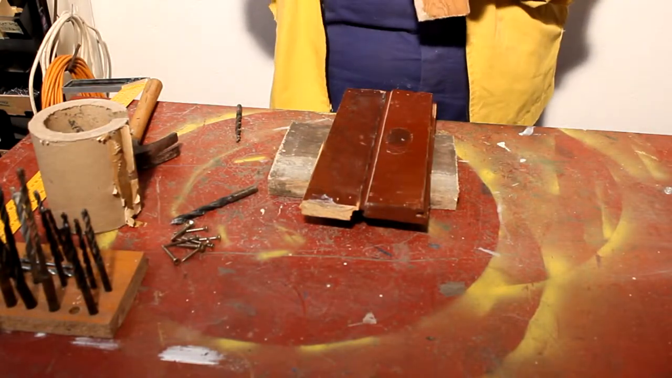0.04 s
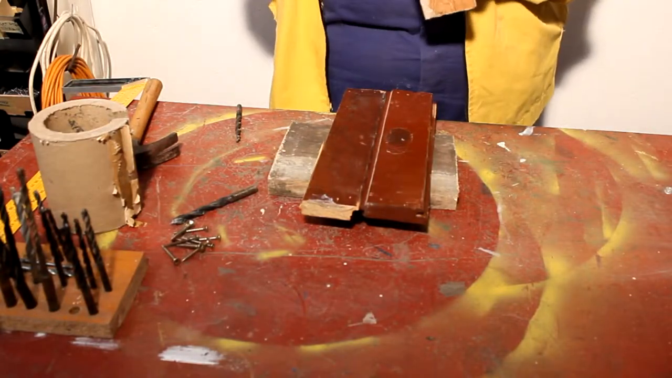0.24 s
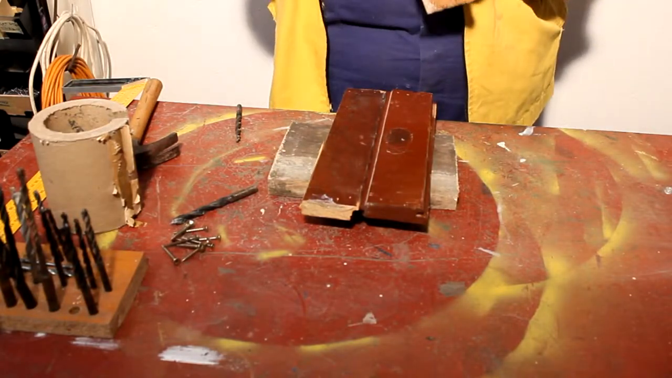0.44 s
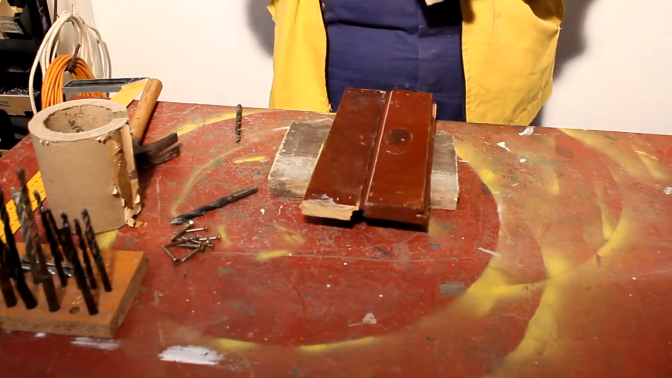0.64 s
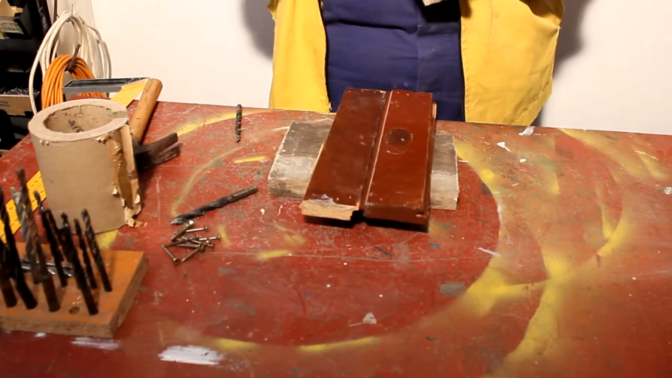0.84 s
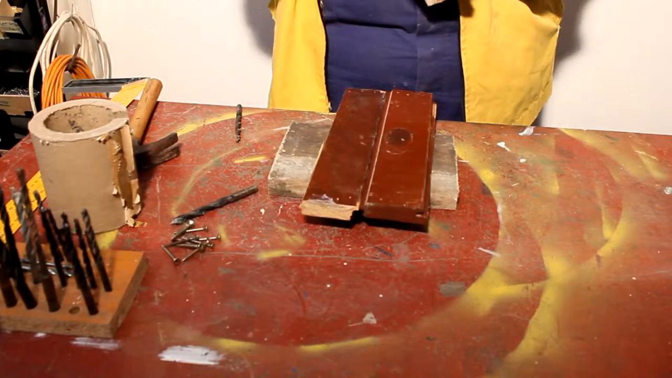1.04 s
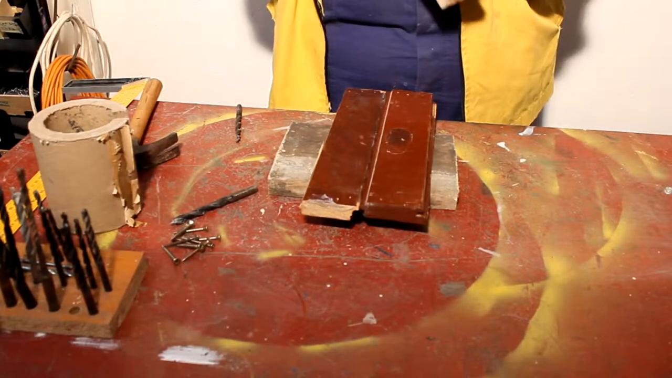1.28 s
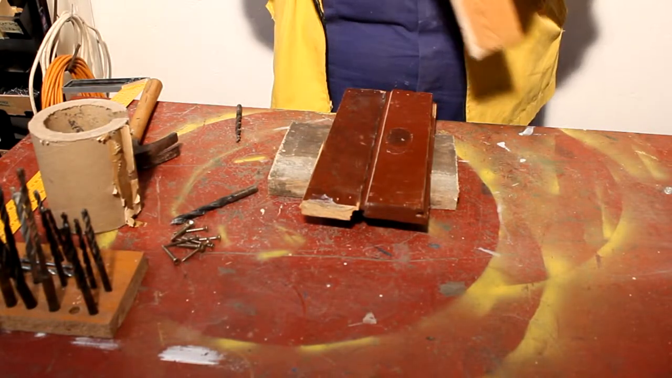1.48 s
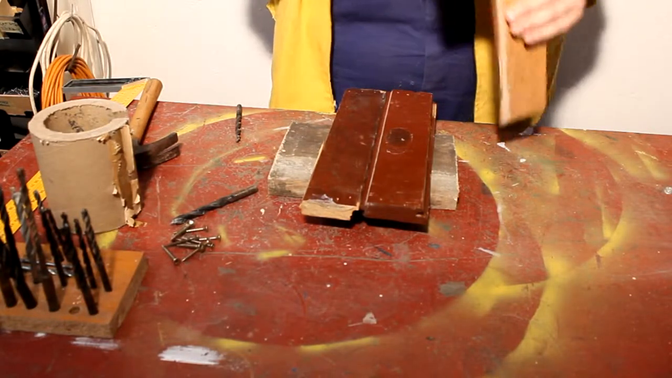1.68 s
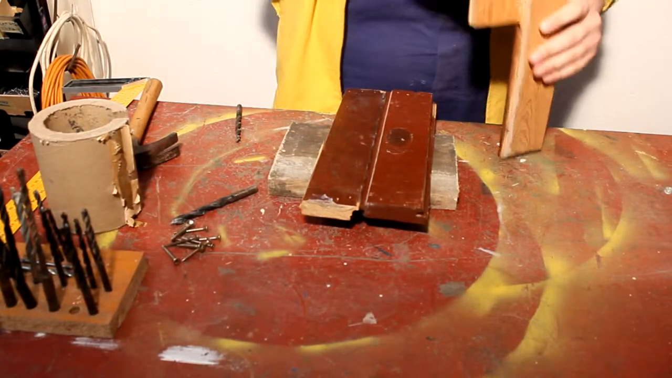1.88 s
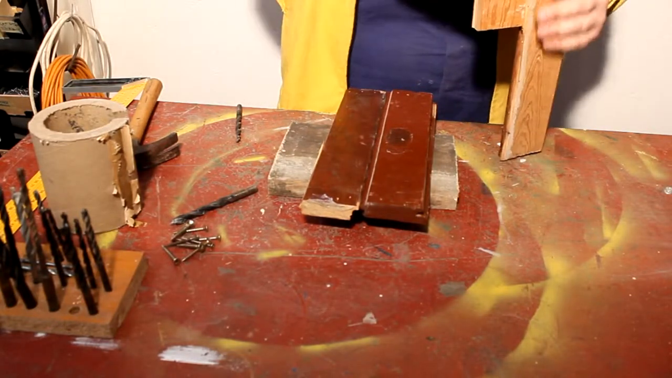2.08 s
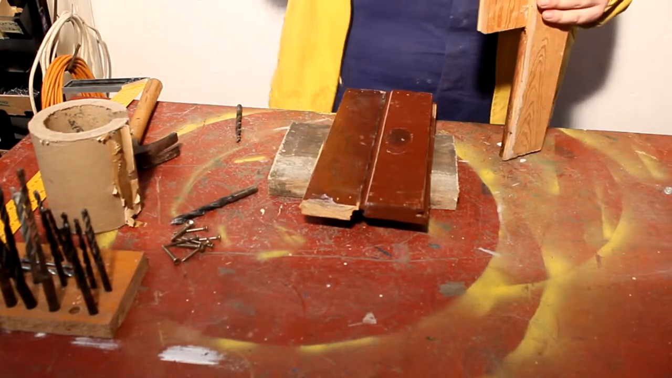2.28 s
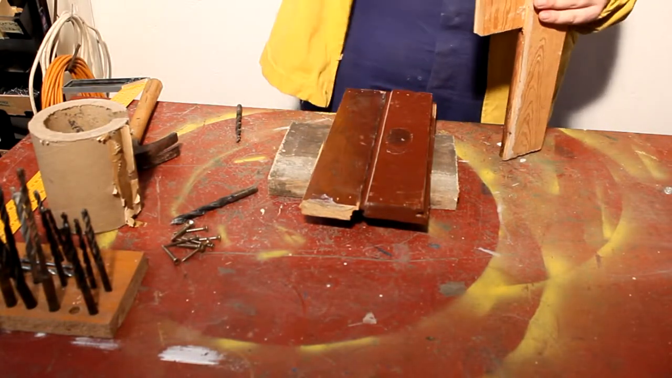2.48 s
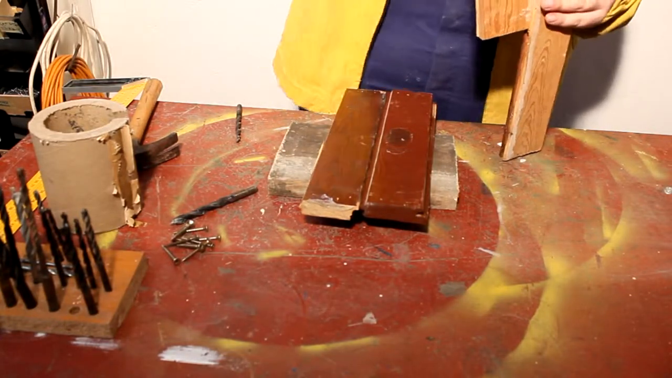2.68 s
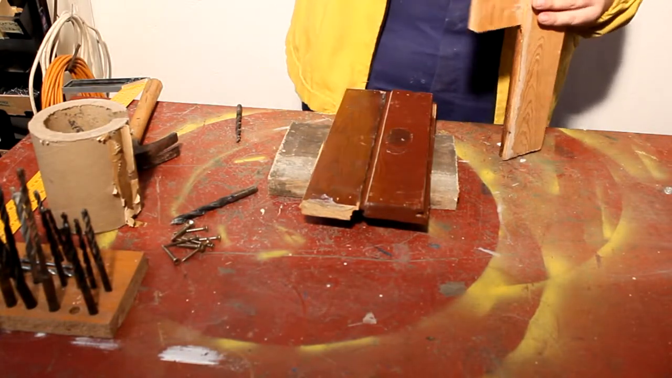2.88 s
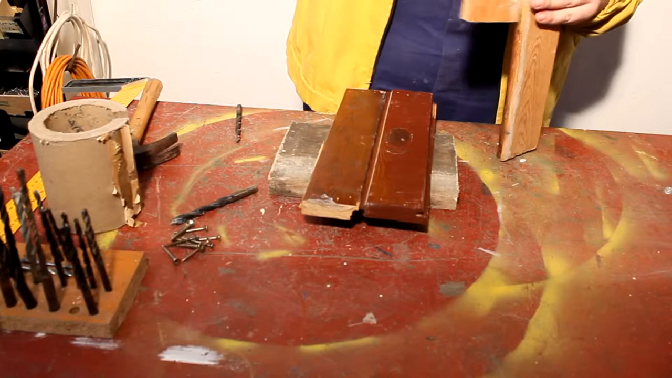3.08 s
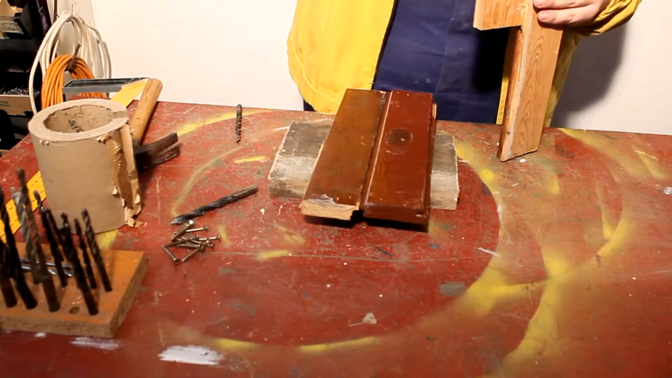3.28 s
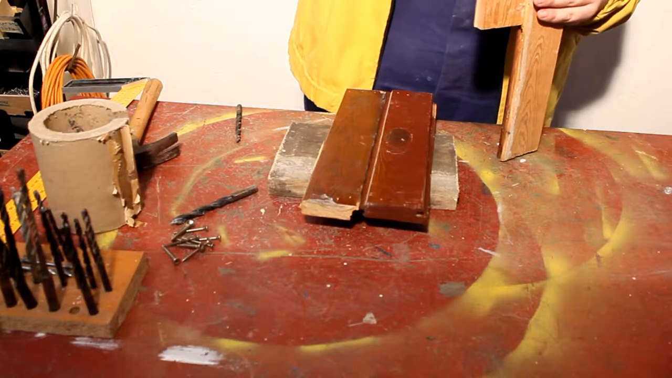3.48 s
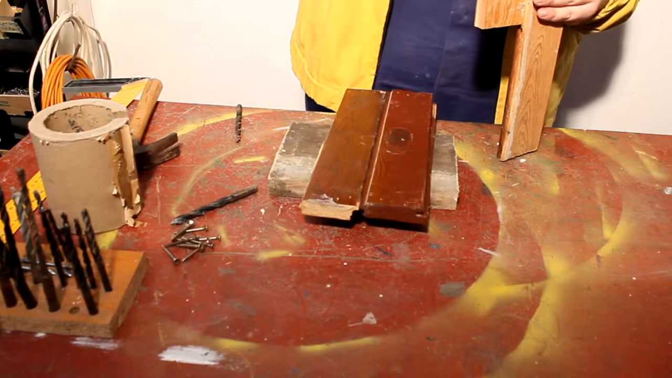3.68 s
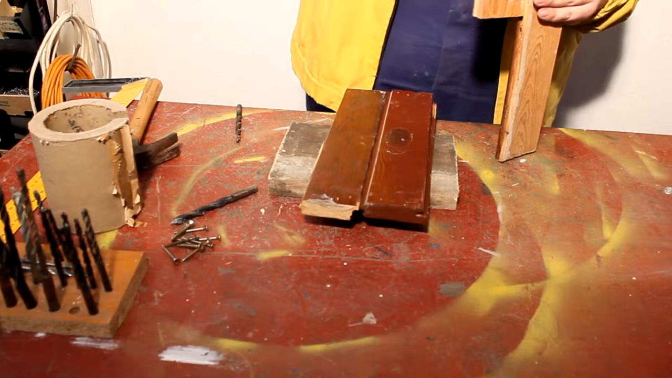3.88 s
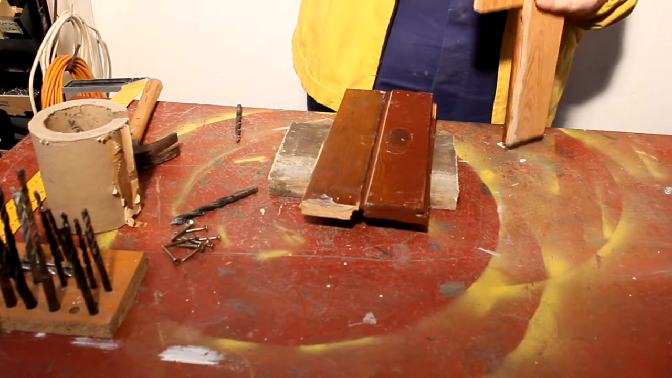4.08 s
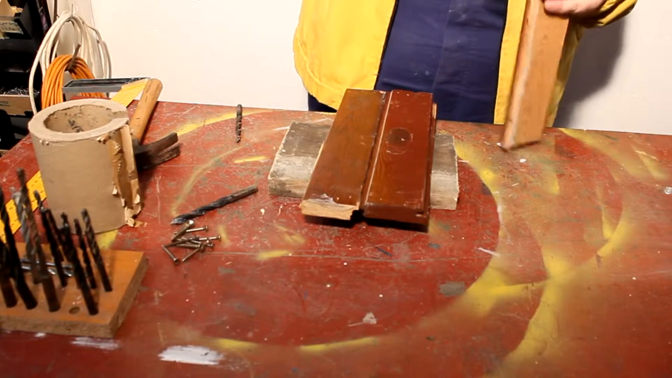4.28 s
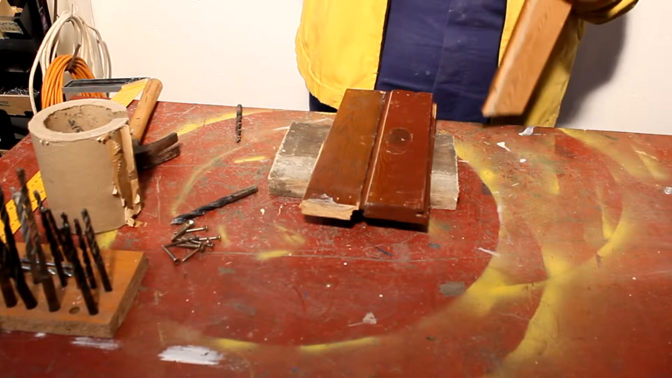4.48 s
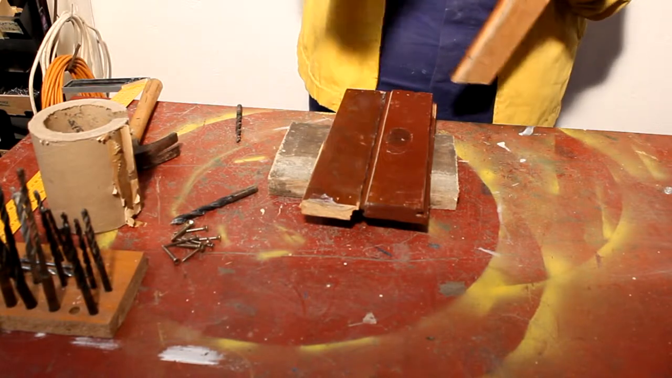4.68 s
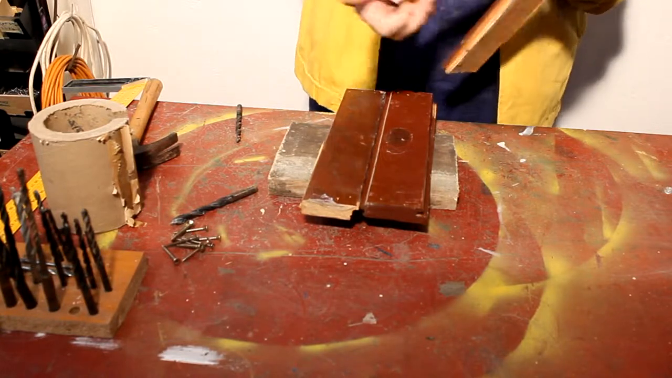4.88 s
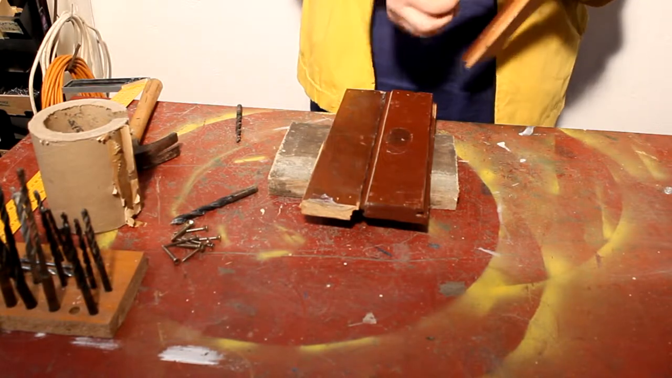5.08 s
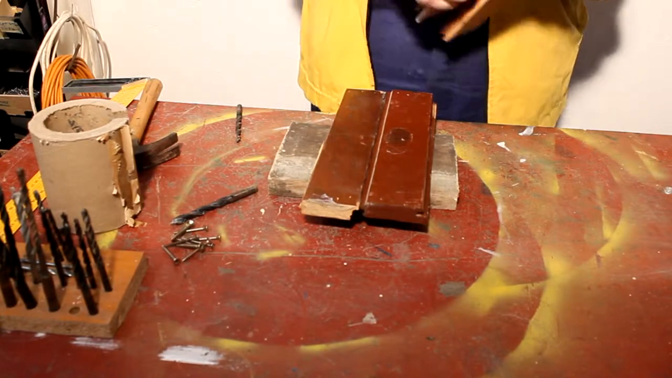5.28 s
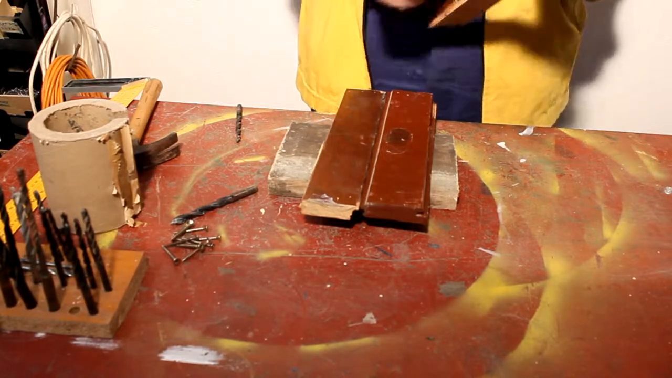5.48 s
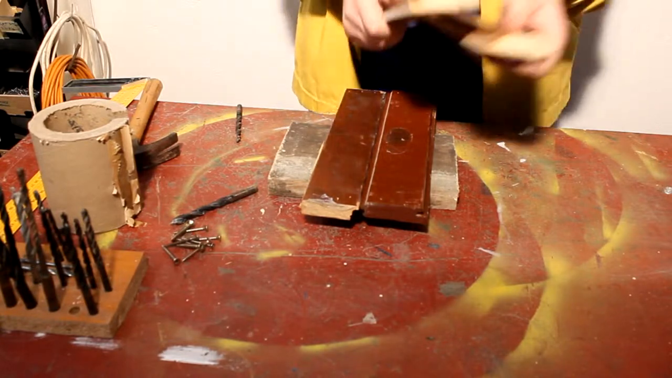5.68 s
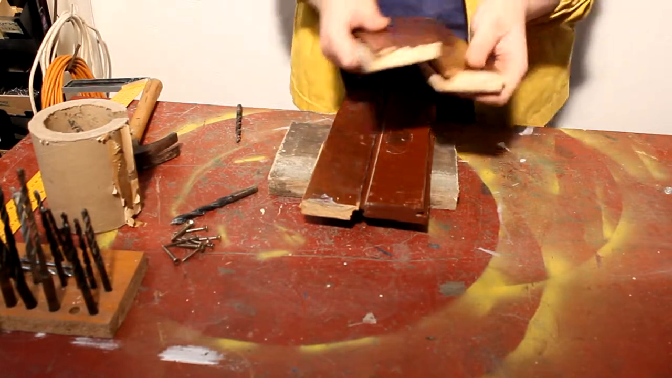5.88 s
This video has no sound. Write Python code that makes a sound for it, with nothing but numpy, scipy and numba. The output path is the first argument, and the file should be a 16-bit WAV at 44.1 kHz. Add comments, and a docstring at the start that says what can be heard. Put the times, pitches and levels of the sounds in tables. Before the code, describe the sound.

Steady faint room tone and hiss run throughout in a bare, ringing workshop. From 0 to 0.65 s two narrow wooden boards rub together in short dry scrapes, the sharpest near 0.6 s. Tiny ticks come around 0.9 s, and faint dull taps and soft jacket rustle between 1.05 and 1.8 s. At 2.0 s a board knocks hard on the workbench, very loud; the limiter squashes it and the echo swells up behind. From 2.6 to 3.4 s come light clicks, clacks, small bench bumps and rubs. A looser, clattery slap lands at 3.9 s, then a rub leads into a second hard knock at 4.27 s, with echo and a thin high drill-bit ring. Scrapes and light wooden clacks follow from 4.7 to 5.4 s, notably at 4.83 s. Near 5.5-5.9 s a low rumble and faint whistling drone swell softly under final clacks at 5.8 s.

```python
"""Over steady room tone and hiss, two narrow wooden boards are first rubbed together, then tapped and knocked
on a workbench in a bare, ringing workshop, with more rubs between; early on a jacket rustles. After a hard
knock a drill bit rings thinly; near the end a low rumble and a faint drone swell. Blows and slips excite modal
resonators, blows add noise cracks, and the rest is shaped noise. A decaying noise tail gives the echo; a limiter
holds the loudest knocks down, so that their echo swells up behind them."""
import sys
import numpy as np
from scipy import signal
from scipy.fft import rfft, irfft
from scipy.io import wavfile
from scipy.ndimage import uniform_filter1d
from numba import njit

SR = 44100
rng = np.random.default_rng(int(sys.argv[2]) if len(sys.argv) > 2 else 0)


def wrap_up_sound(samples):
    """Save the sound to the file named by the first command line argument, as 16-bit audio."""
    columns = np.atleast_2d(samples).T
    # keep every value between -1 and 1, then stretch to whole-number steps
    tamed = np.clip(columns, -1, 1)
    steps = np.round(tamed * 32767).astype(np.int16)
    wavfile.write(sys.argv[1], SR, steps)


N = 262042


def undb(db):
    """Decibel law: amplitude ratio of a level in dB."""
    return 10 ** (np.asarray(db) / 20)


def level(x, db):
    """RMS normalisation: scale a signal to a given mean power."""
    return x * undb(db) / np.sqrt(np.mean(x ** 2))


def band(x, lo_hz, hi_hz, order=2):
    """Bandpass filtering: keep the spectrum between two corner frequencies."""
    corners = [lo_hz, min(hi_hz, .45 * SR)]
    sos = signal.butter(order, corners, "bandpass", fs=SR, output="sos")
    return signal.sosfilt(sos, x + 1e-18)  # the tiny offset avoids denormal numbers


def walk(rate):
    """Slow random modulation: random levels held for 1 / rate s and smoothed twice."""
    hold = int(SR / rate)
    steps = np.repeat(rng.standard_normal(N // hold + 1), hold)
    return 0.38 * uniform_filter1d(uniform_filter1d(steps, hold), hold)[:N]


def strokes(rows, attack_s, release_s, extra_db=0):
    """Envelope of strokes: each a short rise, a steady swell or fade in dB and an exponential end."""
    start, length, db, swell_db = np.array(rows, float)[:, :4].T[:, :, None]
    steps = np.arange(0, N + 32, 32)  # a value every 32 samples
    t = steps / SR - start
    rise = np.clip(t / attack_s + .5, 0, 1)  # centred on the start
    swell = undb(db + extra_db + swell_db * np.clip(t / length, 0, 1))
    gain = rise * swell * np.exp(-np.maximum(t - length, 0) / release_s)
    return np.interp(np.arange(N), steps, gain.sum(axis=0))


def ring(force, modes, sign=-1, shift_db=0):
    """Modal superposition: a force drives decaying resonances, each one now harder, now softer as the contact
    wanders along the board (shift_db sets how much)."""
    out = 0
    for k, (hz, db, t60) in enumerate(modes):
        pole = np.exp(2j * np.pi * hz / SR - np.log(1000) / (t60 * SR))
        drive = force * undb(shift_db * walk(12)) if shift_db else force
        resonator = [1, -2 * pole.real, abs(pole) ** 2]
        out = out + sign ** k * undb(db) * signal.lfilter([0, pole.imag], resonator, drive + 1e-18)
    return out


# spectrum of room tone and hiss: (frequency [Hz], relative spectral level [dB])
AIR_SPECTRUM = [(25, -30), (48, -22), (65, -21), (100, -16), (190, -14.5), (250, -9), (400, -12),
                (660, -14.5), (1070, -14), (2050, -16.5), (8100, -24.5), (10400, -30), (13400, -29),
                (15500, -27.5), (16200, -46)]


def air():
    """Stationary noise: room tone and hiss wander slightly in level, with a narrow steady whine near the top."""
    hz, db = np.transpose(AIR_SPECTRUM)
    f = np.maximum(np.fft.rfftfreq(N, 1 / SR), 1)
    spectrum_gain = undb(np.interp(np.log(f), np.log(hz), db))
    hiss = irfft(rfft(rng.standard_normal(N)) * spectrum_gain, N)
    whine = band(rng.standard_normal(N), 14150, 14450)
    return level(hiss, -53.5) * undb(walk(7.84)) + level(whine, -72.0)


# low rumble near the end: (time [s], length [s], level [dB], swell [dB])
RUMBLE_SWELL = [(5.5, 0.37, -66, 4)]


def rumble():
    """Narrowband noise: a soft low band under a slow envelope."""
    low_band = level(band(rng.standard_normal(N), 62, 77), 0)
    return strokes(RUMBLE_SWELL, attack_s=0.18, release_s=.1) * low_band


# faint drone that swells once: (time [s], length [s], level [dB], swell [dB])
DRONE_SWELL = [(5.58, 0.29, -61, 3)]
# hum and whistles in it: (centre frequency [Hz], bandwidth [Hz], relative level [dB])
DRONE_BANDS = [(133, 16, 16), (770, 110, 8.5), (1420, 30, 2), (1618, 56, 6)]


def drone():
    """Narrowband fluctuation: hum and whistles are narrow noise bands, which waver in level."""
    tones = 0
    for hz, width, db in DRONE_BANDS:
        tones = tones + level(band(rng.standard_normal(N), hz - width / 2, hz + width / 2), db)
    return strokes(DRONE_SWELL, attack_s=.35, release_s=.08) * tones


# jacket rustles as the arms move: (time [s], length [s], level [dB], swell [dB])
RUSTLES = [(1.32, 0.048, -49, -2.5), (1.41, 0.12, -49.5, 1.5), (1.58, .12, -46.5, -4.5),
           (1.71, .11, -51.5, 0)]


def jacket():
    """Friction noise of crinkly cloth: a mid band over broad patchy hiss."""
    fold_hz = 2290
    lowpass = signal.butter(2, 450, fs=SR, output="sos")
    fold = signal.sosfilt(lowpass, rng.standard_normal(N))
    fold = fold * np.cos(2 * np.pi * fold_hz * np.arange(N) / SR)  # low noise moved up around fold_hz
    hiss = band(rng.standard_normal(N), 2000, 6400) * undb(2 * walk(26.0))
    body = band(rng.standard_normal(N), 160, 1440) * undb(6.8 * walk(13.63))
    gain = strokes(RUSTLES, attack_s=0.033, release_s=0.047)
    return gain * (level(fold, -5.1) + level(hiss, -3.5) + level(body, -4.5))


# modes of a steel drill bit on the bench: (frequency [Hz], level [dB], t60 [s])
BIT_MODES = [(4440, -41, 1.5), (4280, -44, 1.3)]


def bit():
    """Beating: one impulse, as of a jolt from the knock, rings two close modes of a drill bit."""
    jolt_s = 4.275
    jolt = 1. * (np.arange(N) == int(jolt_s * SR))
    return ring(jolt, BIT_MODES)


# reverberation time of the workshop: (frequency [Hz], t60 [s])
ROOM_DECAY = [(100, 0.82), (260, 0.61), (700, 0.53), (1840, 0.47), (4850, 0.39), (9000, 0.24),
              (14000, 0.28)]


def room(x):
    """Diffuse reverberation: noise whose half-octave bands die at their own rates, after a short build-up."""
    t = np.arange(SR) / SR
    hz_points, t60_points = np.transpose(ROOM_DECAY)
    tail = 0
    for hz in 60 * 2 ** np.arange(0, 8.1, .5):
        t60 = np.interp(np.log(hz), np.log(hz_points), t60_points)
        noise = band(rng.standard_normal(SR), hz / 2 ** 0.34, hz * 2 ** 0.31)
        tail = tail + noise * 1000 ** (-t / t60)
    tail = tail * np.clip((t - .003) / 0.003, 0, 1)  # builds over the first reflections
    return signal.fftconvolve(x, tail / np.sqrt(np.sum(tail ** 2)))[:N]


def shares(rows):
    """Force partition: the first board's share, held from one contact to the next."""
    start = np.array(rows)[:, 0]
    share = np.clip(np.array(rows)[:, -1], 0, 1)
    latest = np.searchsorted(start, np.arange(N) / SR + .001) - 1  # changes 1 ms ahead of the contact
    return share[np.maximum(latest, 0)]


def both(force, modes, share, shift_db=0):
    """Superposition: two boards ring with their shares of one force."""
    first = ring(force * share, modes[0], shift_db=shift_db)
    second = ring(force * (1 - share), modes[1], shift_db=shift_db)
    return first + second


# modes of the first and second board, excited by rubs and blows: (frequency [Hz], level [dB], t60 [s])
BENDING_MODES = ([(1068, -7, 0.12), (1223, 4, 0.019)], [(1114.3, 0.5, 0.11), (1183, -3.5, 0.061)])
MIDDLE_MODES = ([(2514, 5.5, 0.038), (2659, 1.5, 0.057), (3860, 3, 0.04), (4160, -4, 0.052),
                (4960, -6, 0.011)], [(2838, 2, 0.068), (3510, -6, 0.025), (3760, -9.5, 0.095),
                (4480, -6.5, 0.042), (4600, -6.5, 0.029)])
# high modes common to both boards: (frequency [Hz], level [dB], t60 [s])
HIGH_MODES = [(5000, -4, 0.035), (5410, 0.5, 0.037), (6080, -6, 0.041), (6250, -8.5, 0.058),
              (6890, -2, 0.012), (7400, -39, 0.015), (7980, 0, 0.018), (8560, -28, 0.017),
              (8780, -18, 0.043), (9320, -1, 0.016), (11260, -6.5, 0.027)]
# scrapes, wood on wood: (time [s], length [s], middle level [dB], swell over the stroke [dB],
# bending level above the middle [dB], high level above the middle [dB], share of the first board [0-1])
SCRAPES = [(0, 0.058, -35.5, -14.5, -12, -27, 0.34), (0.054, 0.058, -43, 9.5, -16.5, -9, 0.33),
           (.125, 0.065, -41, 4.5, -15, -4.5, 0), (.312, 0.027, -39.5, -2.5, -15, 7, 0.16),
           (0.344, 0.06, -33.5, -5, -13, 2.5, 0.5), (.401, 0.027, -30, -3, -15.5, 3.5, 0.43),
           (0.438, 0.013, -31, 0.5, -16, 8, 0.5), (0.47, .045, -44, -1, -11, -11, 0.35),
           (0.524, 0.062, -33.5, 9, -17, 2.5, .45), (0.593, 0.018, -16, -8, -20.5, -1.5, 0.25),
           (0.62, 0.022, -26.5, -9, -2, 10, 1), (1.974, 0.033, -58.5, 14.5, -18, -7, 0),
           (2.259, 0.014, -52.5, -4, -20.5, 18.5, 0), (2.318, 0.15, -44.5, -8, -32, 0.5, 0),
           (2.599, 0.065, -50, -0.5, -1, .2, 0.34), (2.664, 0.057, -44, -14, 1, -8, 0.2),
           (2.904, 0.022, -34, -11, -6, 12, 1), (2.962, 0.077, -41.5, -9.5, -4, -7, 0.5),
           (3.08, 0.067, -54.5, 12, -8, -1, 0.57), (3.153, 0.069, -40.5, -2.5, 6.5, -10, 0.6),
           (3.249, 0.11, -48, 8, -3.5, 1, 0.45), (3.826, 0.08, -42.5, -5, -13.5, 3.5, 0.53),
           (4.201, 0.076, -31, 6, -12, -7, 0.51), (4.667, .17, -62, 7.5, 3.5, -13, 0.5),
           (4.847, 0.14, -34, -13.5, 0, -7, 0.35), (5.08, .1, -48.5, -1.5, -11, 1.2, 0.4),
           (5.186, 0.043, -42.5, 5.5, -10, -4, 0.5), (5.237, .12, -44.5, 7.5, -10, -10, 0.43),
           (5.362, 0.098, -36.5, -13, -10.5, -23, 0.1), (5.814, 0.047, -31, -10.5, 4, -3, .05),
           (5.88, 0.062, -47, -10, -5, -8, 0.1)]


def rubbing():
    """Stick-slip friction: dense uneven fibre slips drive the modes, and some hiss comes off the surface."""
    wander_db = 5  # scales how the contact's wandering shifts each mode's drive
    slips = rng.standard_normal(N) * undb(1.6 * rng.exponential(size=N)) * undb(2.64 * walk(60))
    share = shares(SCRAPES)
    low = level(both(slips, BENDING_MODES, share, wander_db), -1.3)
    low = low + level(band(slips, 335, 2900), 0.68)
    middle = level(both(slips, MIDDLE_MODES, share, wander_db), -1.5)
    middle = middle + level(band(slips, 2380, 6270), -2.0)
    high = level(ring(slips, HIGH_MODES, shift_db=wander_db), -11.5)
    high = high + level(band(slips, 4170, 9560), -4.7) + level(band(slips, 9700, 14500), -18.5)
    low_db, high_db = np.array(SCRAPES)[:, 4:6].T[:, :, None]

    def gain(extra_db):
        return strokes(SCRAPES, attack_s=0.0056, release_s=0.0059, extra_db=extra_db)

    return gain(0) * middle + gain(low_db) * low + gain(high_db) * high


def add(track, s, piece):
    """Linear superposition: mix a piece into a track from time s."""
    i = int(s * SR)
    track[i:i + len(piece)] += piece[:N - i]


def chatter(noise, fade):
    """Spectral whitening: a burst with a nearly even spectrum, spread over the time the edges chatter."""
    window = fade ** .5  # fade describes power, its root amplitude
    for _ in range(4):
        spectrum = rfft(noise * window)
        noise = irfft(spectrum / np.abs(spectrum))
    return noise * window / np.linalg.norm(noise * window)


# bench top modes: (frequency [Hz], level [dB], t60 [s])
BENCH_MODES = [(155, -28, 0.077), (225.4, -4.5, 0.17), (244, -0.5, 0.069), (342, 4.5, 0.059),
               (389, -6, 0.26), (468, 2, 0.046), (525, -1, 0.093), (582.4, 4, 0.075), (678.6, 6, 0.068),
               (751, 9.5, 0.05), (836, 6.5, 0.064), (958, 18, 0.034), (1390, 18.5, 0.034),
               (1562, 25, 0.014), (1836, 16.5, 0.077), (2200, -24, 0.018)]
# blows, with relative drive levels: (time [s], bench level [dB], contact [ms], bending level [dB],
# upper modes level [dB], crack level [dB], crack power decay [ms], share of the first board [0-1])
IMPACTS = [(.868, -82, 1, -73, -51, -33, 0.73, 0.7), (0.878, -79, 1, -60, -54, -40, 0.78, .6),
           (0.895, -64, 1.3, -57, -32, -29, 1.5, .6), (1.055, -43, 2.5, -67, -68, -68, .9, .6),
           (1.188, -41, 1.7, -38.5, -46, -49, 3.8, 0.5), (1.385, -41, 2, -43, -70, -70, 1.1, .5),
           (1.413, -33, 2.2, -47, -70, -70, 1, .52), (1.71, -43, 1.7, -73, -82, -70, 1.3, .45),
           (2.0067, 11, 1.054, 9, -9, 23, 5.45, 0.1), (2.573, -70, 1, -62, -29, -24, 0.3, 0.2),
           (2.603, -38, 1.5, -39, -23.5, -15, 0.59, 0.1), (2.669, -22, 2.27, -44, -32, -23.5, 8, .27),
           (2.706, -25.5, 1.03, -50, -49, -42, 3, .28), (2.735, -24, 1.84, -58, -30, -11.5, 1.25, 0.46),
           (2.909, -27, 2.1, -35, -21.5, -11, 0.74, 0.06), (2.952, -60, 1.5, -48, -31, -21, .58, .32),
           (2.982, -23.5, 1.75, -56, -46, -16.5, .4, .33), (3.144, -24, 3, -50, -47, -26, 1.3, .35),
           (3.156, -17, 1.75, -41, -50, -40, 5.7, .35), (3.162, -19.5, 1.6, -50, -52, -40, 3, .36),
           (3.169, -10.5, 1.35, -21.5, -34, -25, 9.6, 0.9), (3.19, -19, 1.16, -40, -52, -21, 2.1, 0.2),
           (3.316, -60, 1.1, -60, -56, -26, 1.7, .38), (3.359, -8, 3.47, -65, -63, -54, 3, .4),
           (3.367, -13.5, 1.64, -25, -55, -26.5, 6.8, 0.05), (3.735, -37.5, 2.2, -58, -65, -60, 1.1, 0.5),
           (3.923, -9, 1.08, -13.5, -49, -4.5, 31, 0), (3.931, -4.5, .87, -32, -49, -6.5, 26, .45),
           (4.179, -73, 1.1, -60, -58, -28, 1.3, .48), (4.2715, 10, 0.98, 10.5, -26, 22.5, 6.6, 0.8),
           (4.833, -24, 0.61, -9.5, -11, -14, 6.9, 0.62), (4.914, -57, .8, -45, -24.5, -21, 2, 0.6),
           (4.95, -59.5, .91, -45, -27, -20.5, 2.8, 0.5), (5.19, -61, 1.2, -67, -32, -23.5, 1.6, 0.6),
           (5.221, -65, 0.84, -45, -29, -37, 0.66, 0.3), (5.39, -32.5, 2.35, -65, -64.5, -73, 1.1, 0.2),
           (5.773, -45, 0.94, -4, -22, -13.5, 9, 0), (5.816, -27, 1.4, -33, -13, -13.5, 2.5, 0.38),
           (5.878, -38, 0.96, -44, -26, -20.5, 0.71, .4)]


def blows():
    """Impact excitation: each blow pushes the bench, rings the boards and cracks. Returns bench, board sound."""
    push, bend, upper, crack, slap = np.zeros((5, N))
    t = np.arange(2048) / SR
    grit = rng.standard_normal((len(IMPACTS), len(t)))
    for row, noise in zip(IMPACTS, grit):
        s, bench_db, contact_ms, bend_db, upper_db, crack_db, crack_ms, _ = row
        shape = np.sin(np.pi * np.clip(t * 1000 / contact_ms, 0, 1)) ** 1.5  # softer contact, longer push
        add(push, s, undb(bench_db) * shape / shape.sum())
        add(bend, s, undb(bend_db) * t * np.exp(-t / 0.00022) / SR / 0.00027 ** 2)
        add(upper, s, undb(upper_db) * (t == 0))  # a single impulse
        fade = np.exp(-t * 1000 / max(crack_ms, .1))
        add(crack, s + 0.000958, undb(crack_db) * chatter(noise, fade))
        # flat contact slaps lower than an edge
        add(slap, s, np.tanh(crack_ms / 6.5) * undb(crack_db) * chatter(noise[::-1], fade))
    share = shares(IMPACTS)
    board = 3.1 * both(bend, BENDING_MODES, share) + 0.4 * both(upper, MIDDLE_MODES, share)
    board = board + 0.21 * ring(upper, HIGH_MODES)
    edges = undb(16.0) * band(crack, 3170, 7650, order=3) + undb(-1) * band(crack, 9600, 14700)
    top = 0.34 * ring(push, BENCH_MODES, 0.94) + undb(22.0) * band(slap, 514, 2730)
    return top + edges, board


def scene():
    """Direct and reverberant field: boards and bench excite the room; the other sources stay dry."""
    bench, board = blows()
    held = board + rubbing()
    wet = room(undb(-4.0) * bench + undb(-9) * held)
    return (bench + held + wet + jacket() + drone() + bit())[None]


@njit
def follow(x, attack, release):
    """Peak following: an envelope quick up, slow down."""
    e, out = 0., np.empty(len(x))
    for i in range(len(x)):
        a = abs(x[i])
        e += (a - e) * (attack if a > e else release)
        out[i] = e
    return out


def record(dry):
    """Dynamic compression: deep bass is dropped, the limiter ducks after a few ms and soon lets go, and
    first swings clip; background noise joins after the limiter."""
    attack_s, release_s, threshold_db, top_hz = 0.002, 0.043, -5.0, 16000
    sound = band(dry, 267, SR / 2, order=3)
    envelope = follow(sound[0], 1 / (attack_s * SR), 1 / (release_s * SR))
    gain = np.minimum(1, undb(threshold_db) / (envelope + 1e-9)) ** 0.81
    limited = np.clip(sound * gain, -1, 1)
    heard = band(limited, 57, SR / 2) + air() + rumble()
    lowpass = signal.ellip(8, .2, 70, top_hz, fs=SR, output="sos")
    return np.clip(signal.sosfilt(lowpass, heard), -1, 1)


dry = scene()
out = record(dry)
wrap_up_sound(out)
```